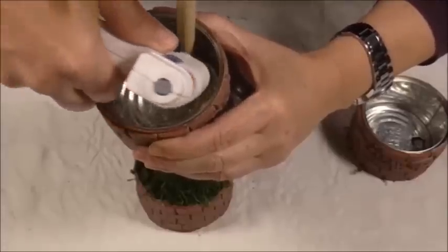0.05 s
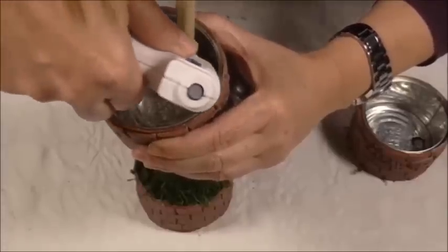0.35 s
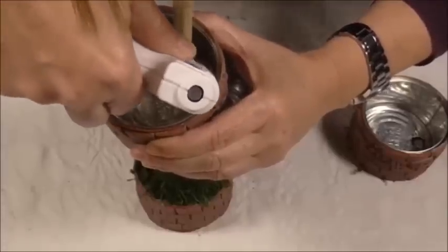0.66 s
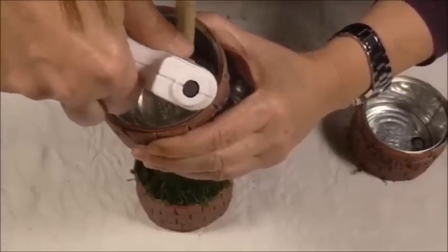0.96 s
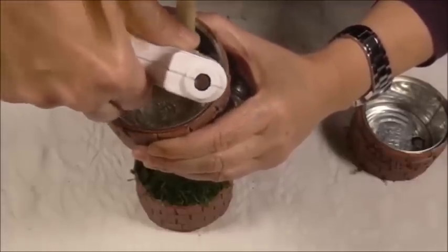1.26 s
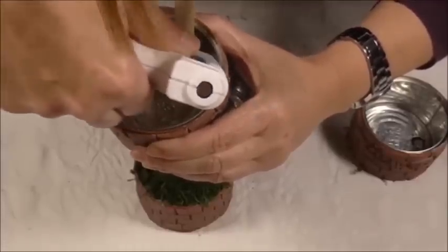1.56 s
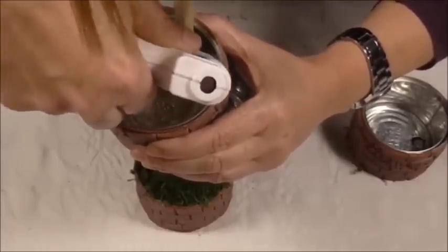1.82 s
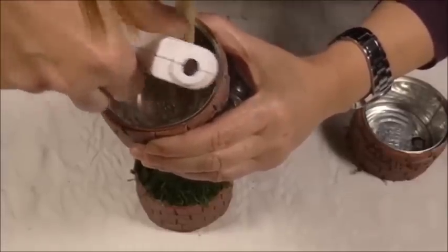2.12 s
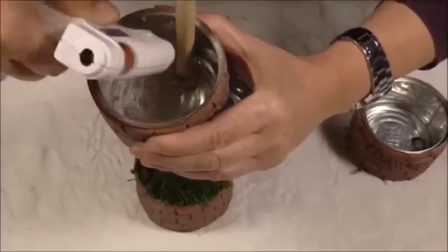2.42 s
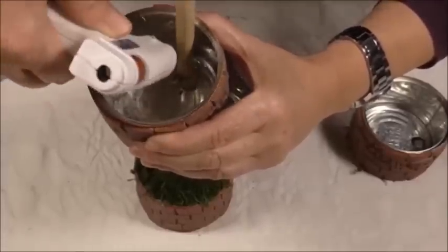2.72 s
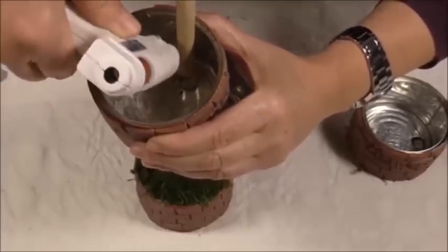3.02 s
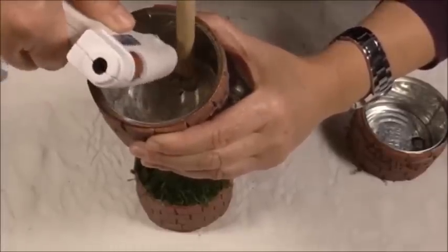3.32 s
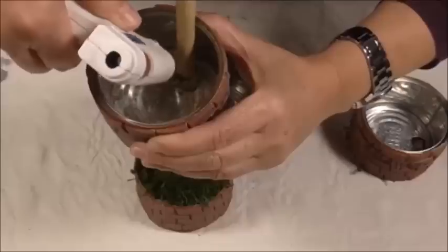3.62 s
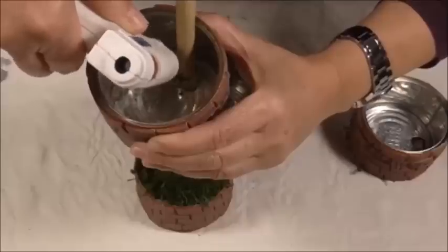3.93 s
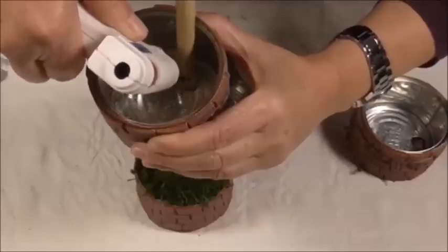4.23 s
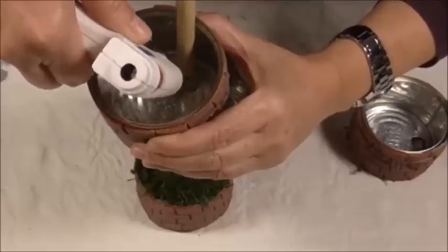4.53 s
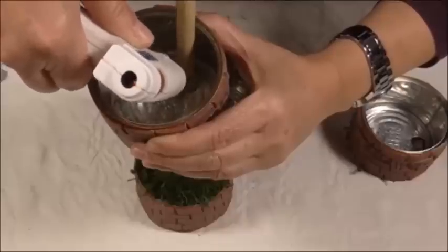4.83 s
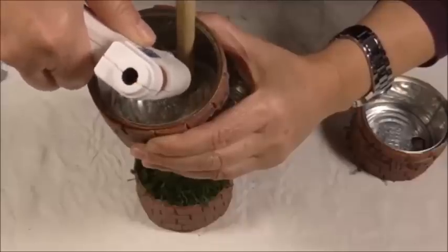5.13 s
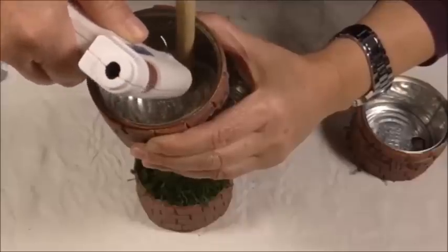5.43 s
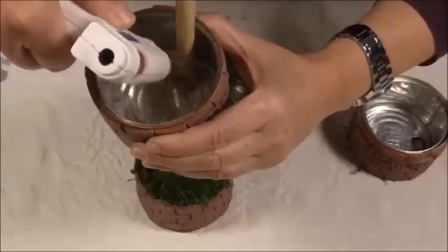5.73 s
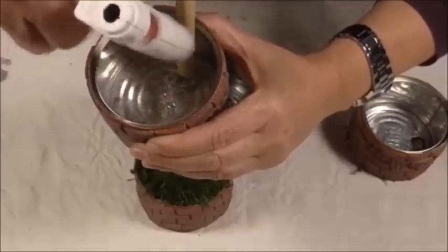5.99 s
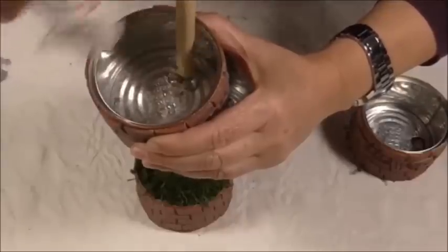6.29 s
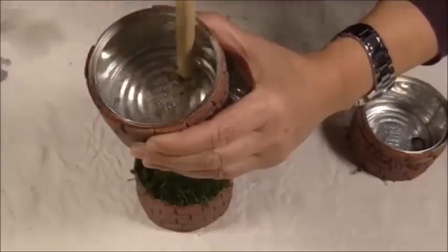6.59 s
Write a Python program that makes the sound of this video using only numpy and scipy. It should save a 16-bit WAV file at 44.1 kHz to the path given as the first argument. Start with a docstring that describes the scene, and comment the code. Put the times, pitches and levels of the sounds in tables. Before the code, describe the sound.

In a quiet small room, hands rub faintly on a tin can as a glue gun's nozzle knocks lightly against it. Close, thin trigger clicks and springy snaps come about once a second, mixed with soft table bumps and the faint drag of the glue stick. One sharp crack stands out, a few more clicks follow, then dull thuds and a sleeve brushing the tablecloth.

```python
"""In a small quiet room, a hot glue gun is squeezed inside a tin can on a paper-covered table. Hands rub and
crackle as they shift their grip, the table booms softly under them, and the nozzle knocks on the tin. The
plastic trigger ticks, then snaps home with a zing of its spring; the glue stick drags through its guide, and
once it jams and lets go with a loud crack and a brief trailing hiss. At the end the gun is laid down and a
sleeve swishes over the paper."""
import sys
import numpy as np
from scipy import signal
from scipy.fft import rfft, irfft, next_fast_len
from scipy.io import wavfile
from scipy.ndimage import uniform_filter1d

SR = 44100
rng = np.random.default_rng(int(sys.argv[2]) if len(sys.argv) > 2 else 0)


def inscribe(sig):
    """Save sig as 16-bit PCM at rate SR to the path in sys.argv[1].

    A 1-D sig is mono; a 2-D sig holds one channel per row.
    Samples are clipped to [-1, 1] before scaling.
    """
    pcm = np.round(np.clip(np.atleast_2d(sig).T, -1, 1) * 32767)
    wavfile.write(sys.argv[1], SR, pcm.astype(np.int16))


N = 302284


def gain_of(db):
    """Decibels to amplitude."""
    return 10 ** (np.asarray(db) / 20)


def unit_rms(x):
    """Scales to an rms of 1."""
    return x / np.sqrt(np.mean(x ** 2) + 1e-20)


def unit_peak(x):
    """Scales the loudest two milliseconds to an rms of 1."""
    return x / np.sqrt(uniform_filter1d(x ** 2, 88, mode="constant").max())


def curve_at(points, hz):
    """Reads a curve on a log-frequency axis."""
    f, value = np.transpose(points)
    return np.interp(np.log(hz + 1), np.log(f + 1), value)


def add(mix, s, sound):
    """Mixes a sound in at s seconds."""
    part = mix[..., max(round(s * SR), 0):][..., :sound.shape[-1]]
    part += sound[..., :part.shape[-1]]


def eq(x, points):
    """Minimum-phase EQ through the given (Hz, dB) points."""
    size = 2 * len(x)
    log_gain = np.log(gain_of(curve_at(points, abs(np.fft.fftfreq(size, 1 / SR)))))
    response = np.exp(np.conj(signal.hilbert(log_gain)))
    return np.fft.ifft(np.fft.fft(x, size) * response).real[:len(x)]


def stereo_noise(spectrum, correlation, resonances=()):
    """Noise of rms 1 with a given spectrum, left-right correlation and resonances."""
    hz = np.fft.rfftfreq(N, 1 / SR)
    a, b = rfft(rng.standard_normal((2, N)))
    same = np.clip(curve_at(correlation, hz), -1, 1)
    pair = np.array([a, same * a + np.sqrt(1 - same ** 2) * b])
    peaks_db = sum(lift / (1 + (2 * (hz - f) / width) ** 2) for f, width, lift in resonances)
    return unit_rms(irfft(pair * gain_of(curve_at(spectrum, hz) + peaks_db), N))


def noise_band(hz, width_hz, size):
    """Noise of rms 1 in one resonance."""
    edges = np.clip([hz - width_hz / 2, hz + width_hz / 2], 30, SR / 2 - 100)
    bandpass = signal.butter(2, edges, "band", fs=SR, output="sos")
    return unit_rms(signal.sosfilt(bandpass, rng.standard_normal(size)))


def ring(modes, t, pitch=1):
    """Dying sines, neighbours in opposite polarity."""
    return sum((-1) ** k * gain_of(db - 60 * t / t60) * np.sin(2 * np.pi * hz * pitch * t)
               for k, (hz, db, t60) in enumerate(modes))


def strike(modes, t, detune, chatter_db, chatter_t60, spike):
    """A contact gives a spike and a brief chatter and rings the object, a little differently each time."""
    force = rng.standard_normal(len(t)) * gain_of(-60 * t / chatter_t60)
    force[0] = spike
    chatter = eq(force, [(250, -4.5), (900, 3), (16000, -2.5)])
    body = ring(modes, t, pitch=1 + detune * rng.uniform(-1, 1))
    return unit_peak(unit_peak(body) + gain_of(chatter_db) * unit_peak(chatter))


def room_send(direct, colour):
    """Summed over all directions a hit keeps its energy and broad colour, but its notches even out."""
    pulse = eq(signal.unit_impulse(len(direct)), colour)
    return pulse * np.linalg.norm(direct) / np.linalg.norm(pulse)


# Colour of the still air. Each row: frequency in Hz, relative level in dB.
AIR_EQ = [(12, -45), (20, -16.5), (104, -8.5), (163, -0.5), (270, -8.5), (337, -0.5), (388, -7.5),
          (558, -3), (698, -9.5), (1060, -9), (2910, -22.5), (4180, -20), (7950, -26), (14300, -26),
          (16000, -34.5)]
# Its stereo image. Each row: frequency in Hz, left-right correlation.
AIR_IMAGE = [(60, 0.3), (180, 0.17), (550, -0.39), (1650, -0.42), (4970, 0.26), (15000, 0.097)]


def room_tone(level_db):
    """A wide, steady bed of low air."""
    return gain_of(level_db) * stereo_noise(AIR_EQ, AIR_IMAGE)


# The dull rub on the paper. Each row: frequency in Hz, relative level in dB.
RUB_EQ = [(30, -46), (80, -29), (130, -16), (400, -9), (900, -9), (1500, -8.5), (2200, -12), (2500, -19),
          (3500, -35.5), (6000, -58.5)]
# The table top colours what rubs or lands on it. Each row: centre in Hz, width in Hz, boost in dB.
TABLETOP_PEAKS = [(145.4, 25, 12.5), (303, 190, 9), (456, 42, 9), (645, 53, 6.5), (793, 55, 10.5),
                  (1064, 70, 10), (1380, 70, 6.5), (1655, 30, 3.5)]
# Stereo image of close rubs and thuds. Each row: frequency in Hz, left-right correlation.
CLOSE_IMAGE = [(60, 0.19), (180, 0.45), (550, 1), (1650, 0.38), (4970, 0.84), (15000, 0.16)]


def friction(grain_db):
    """Skin and fabric textures: a dull rub, and a fast flutter of gain that makes a hiss grainy."""
    grain = gain_of(grain_db * unit_rms(uniform_filter1d(rng.standard_normal(N), size=180)))
    return stereo_noise(RUB_EQ, CLOSE_IMAGE, TABLETOP_PEAKS), grain


# The hands shift their grip, and a brief hiss trails the loud crack (the row at 4.53 s).
# Each row: start in seconds, length in seconds, relative level in dB.
RUSTLE_SWELLS = [(-0.05, .58, -52.5), (0.727, 0.076, -56), (1.105, 0.36, -55), (1.72, 0.029, -55.5),
                 (2.14, .68, -53.5), (3.46, 0.48, -56.5), (4.53, .1, -64), (5.422, 0.23, -67)]


def rustle_envelope(rest_db=-67, attack_s=.04, release_s=.09, sag_db_per_s=-2.5):
    """Each grip shift, and the hiss after the crack, sets in, sags and dies back to the resting level."""
    t, power = np.arange(N) / SR, gain_of(rest_db) ** 2
    for start, length, db in RUSTLE_SWELLS:
        held = np.clip(t - start, 0, length)
        attack = np.minimum(held / attack_s, 1)
        release = np.exp(-np.maximum(t - start - length, 0) / release_s)
        power += (gain_of(db + sag_db_per_s * held) * attack * release) ** 2
    return np.sqrt(power)


# The sleeve's bright rustle. Each row: frequency in Hz, relative level in dB.
SLEEVE_EQ = [(1530, -34), (2600, -10), (3290, -9.5), (3720, -5), (3990, -13.5), (4390, -4.5), (4780, -8),
             (5060, -5.5), (7150, -9.5), (12000, -16), (15600, -44.5), (22000, -120)]


def rustle(rub, grain, rub_db, sleeve_db):
    """Skin rubs and the sleeve rustles; the same textures make the hiss after the crack."""
    sleeve = grain * stereo_noise(SLEEVE_EQ, CLOSE_IMAGE)
    return rustle_envelope() * (gain_of(rub_db) * rub + gain_of(sleeve_db) * sleeve)


# Pushes and landings on the table. Each row: start in seconds, relative boom level in dB,
# boom attack in seconds, boom tilt in dB per octave, thud level in dB.
TABLE_BUMPS = [(0.001, -54, .007, 4, -61), (0.205, -52, 0.013, 6, -64), (0.752, -50, 0.012, -0.5, -71),
               (1.083, -43, 0.008, -7, -47.5), (1.112, -42, .007, 4.5, -56), (1.315, -38.5, 0.1, 11.5, -55),
               (1.405, -43, 0.02, 9, -65), (1.53, -48.5, .009, 1, -64), (2.21, -45, 0.0041, 3, -49),
               (2.53, -42, 0.016, 10.5, -47.5), (2.562, -32.5, 0.013, 3.5, -63),
               (2.925, -59, .008, 10, -67), (3.57, -52, .024, -11, -57), (4.428, -46.5, 0.014, 4, -67),
               (6.15, -53, 0.016, 10, -41.5), (6.535, -46.5, .01, -5, -39.5), (6.79, -66, .01, -2, -63)]
# The table's low modes. Each row: frequency in Hz, relative level in dB, T60 in seconds.
TABLE_MODES = [(90.7, -11.5, 0.088), (147.4, -2, 0.36), (210.2, -8.5, 0.28), (300.4, -11.5, 0.2),
               (381, -11.5, 0.042), (515, -26.5, .15)]
# The muffled thud. Each row: frequency in Hz, relative level in dB.
THUD_EQ = [(30, -40), (80, -16), (130, -15), (320, 1), (500, -8), (780, 0), (1300, -4.5), (1800, -9.5),
           (2700, -35), (6000, -51)]


def table_bumps(thud_t60, boom_left_db):
    """Each push swells the table's low modes and gives a dull thud through the paper cover."""
    t, boom, thud_envelope = np.arange(SR // 2) / SR, np.zeros(N), np.zeros(N)
    pivot_hz = TABLE_MODES[1][0]
    for s, db, attack_s, tilt, thud_db in TABLE_BUMPS:
        modes = [(hz, level + tilt * np.log2(hz / pivot_hz), t60) for hz, level, t60 in TABLE_MODES]
        add(boom, s, 2 * gain_of(db) * (1 - np.exp(-t / attack_s)) * ring(modes, t))
        add(thud_envelope, s, gain_of(thud_db - 60 * t / thud_t60))
    pan = gain_of([[boom_left_db / 2], [-boom_left_db / 2]])
    return pan * boom + thud_envelope * stereo_noise(THUD_EQ, CLOSE_IMAGE, TABLETOP_PEAKS)


# The tin can, damped by the hand. Each row: frequency in Hz, relative level in dB, T60 in seconds.
CAN_MODES = [(684, -0.5, 0.11), (752, -10, 0.11), (834, -8, 0.073), (1030, 0, .05), (1184, 0, 0.068),
             (1411, -5.5, 0.066), (1783, -6, 0.061), (1880, -19, .05), (2280, 1, 0.018), (3490, -6, 0.092),
             (4146, 4, 0.038), (4570, 8, 0.0085), (6070, -1, 0.017), (7200, -20.5, 0.011),
             (10000, 13, 0.0047), (12830, -7, .005)]
# Colour of a fingertip's tiny slip. Each row: frequency in Hz, gain in dB.
CRACKLE_EQ = [(300, -17), (1400, -6), (2500, -3.5), (4500, 0), (6500, -5), (12000, -19.5)]


def finger_crackle(level_db, spots, slips_per_s, spread_db):
    """Skin sticks and slips at random, faintly ticking the tin at a few spots; swells with the rustle."""
    t, out = np.arange(SR // 10) / SR, np.zeros(N)
    for _ in range(spots):
        strength = gain_of(spread_db * np.minimum(rng.exponential(1, N), 2))
        slips = strength * (rng.random(N) < slips_per_s / SR / spots)
        tick = strike(CAN_MODES, t, detune=.06, chatter_db=5.5, chatter_t60=.015, spike=2.7)
        out += signal.oaconvolve(slips, eq(tick, CRACKLE_EQ))[:N]
    return gain_of(level_db) * out * rustle_envelope()


# The nozzle meets the can. Each row: start in seconds, relative level in dB, lows in dB,
# treble in dB, frequency that the spot favours in Hz.
NOZZLE_KNOCKS = [(0.2099, -43.5, -11, -10, 1250), (0.2275, -42.5, -18, -16, 1680),
                 (0.2757, -42, -42, -9, 4400), (0.619, -49, -17, 15, 9000), (0.728, -48, -3, -7, 1000),
                 (1.075, -36.5, -2, -0.5, 694), (1.1141, -37, -22, -4, 1150), (1.298, -57, -8, 1, 5470),
                 (1.3992, -45.5, 1, -4, 1100), (2.1925, -43, -18, -3, 4200),
                 (2.2069, -31.5, -20, -4.5, 1210), (2.2293, -37.5, -1, -6, 1230),
                 (2.5247, -26, 2, -22, 760), (2.5464, -37, 8, -6, 818), (3.5728, -39, -16, -7, 1380),
                 (3.843, -43.5, -22, -9, 3800), (4.4494, -58.5, -12.5, -14, 1080),
                 (4.7902, -40.5, -10, -3.5, 1200), (4.854, -44.5, -12.5, -11.5, 1110),
                 (4.9793, -46, -34, -14, 2120), (5.4111, -36.5, -12, -9, 5070),
                 (5.4893, -52, -4, -15, 1090), (5.9932, -42.5, 1, -18, 900),
                 (6.0106, -44.5, -15, -12, 1050)]


def nozzle_knocks(level_db, spot_db, top_db):
    """The nozzle knocks and scuffs on the tin wall; each spot favours its own part of the spectrum."""
    t, out = np.arange(SR // 5) / SR, np.zeros(N)
    for s, db, low_db, high_db, spot_hz in NOZZLE_KNOCKS:
        knock = strike(CAN_MODES, t, detune=0.021, chatter_db=4, chatter_t60=0.067, spike=4)
        knock = eq(knock, [(spot_hz / np.sqrt(2), 0), (spot_hz, spot_db), (spot_hz * np.sqrt(2), 0)])
        colour = [(800, low_db), (1100, -5.0), (2800, -6.5), (4800, high_db), (8000, high_db),
                  (10500, high_db + top_db)]
        add(out, s, gain_of(db + level_db) * unit_peak(eq(knock, colour)))
    return out


# The trigger ticks as it takes up slack. Each row: start in seconds, relative level in dB,
# treble in dB, ring frequency in Hz.
TRIGGER_TICKS = [(0.765, -41.5, 1, 8340), (0.779, -38, -1.5, 4740), (1.1043, -33.5, -8, 8000),
                 (1.9653, -30, 2, 6950), (2.1978, -34, -9, 4500), (2.5247, -33, -3.5, 5800),
                 (3.1837, -54, -4, 6000), (3.2395, -50.5, 2, 4840), (3.254, -45, 5, 7700),
                 (3.5585, -32.5, -7, 7900), (4.1985, -35.5, -1.5, 5600), (4.4856, -31.5, -11.5, 7660),
                 (5.0246, -31.5, 1.5, 7550), (5.3649, -25.5, -2.5, 7520)]
# Let go, it snaps home on its spring. Each row: start in seconds, relative level in dB, ring in Hz.
TRIGGER_SNAPS = [(0.849, -27, 6560), (2.0042, -26, 6450), (3.3129, -26, 5950), (4.2596, -26, 7000),
                 (5.0518, -26, 7330)]
# The plastic shell and lever. Each row: frequency in Hz, relative level in dB, T60 in seconds.
SHELL_MODES = [(1083, -1.5, 0.081), (1357, 8.5, 0.0073), (2660, 2, 0.0089), (3527, -23, 0.017),
               (4010, -6.5, 0.019), (4640, -4, 0.0099), (5240, 14.5, 0.003), (6200, 0, 0.031),
               (6850, -6.5, 0.0031), (7970, 1.5, 0.051), (9420, 12, 0.011), (9830, 2.5, 0.0086),
               (11690, 13.5, 0.012), (12900, -6, .008), (13770, 10.5, 0.013), (14700, 2, .009)]


def trigger_clicks(level_db, focus_db, tick_lows_db=-12.5, snap_lows_db=-25.5, snap_treble_db=-5.5):
    """Hollow ticks and thin snaps ring the plastic shell. Returns the direct sound and its room send."""
    t, out = np.arange(SR // 10) / SR, np.zeros((2, N))
    ticks = [(s, db, tick_lows_db, high_db, hz) for s, db, high_db, hz in TRIGGER_TICKS]
    snaps = [(s, db, snap_lows_db, snap_treble_db, hz) for s, db, hz in TRIGGER_SNAPS]
    for s, db, low_db, high_db, focus_hz in ticks + snaps:
        click = strike(SHELL_MODES, t, detune=0.069, chatter_db=-5, chatter_t60=0.025, spike=2.6)
        click = eq(click, [(focus_hz / 1.08, 0), (focus_hz, focus_db), (focus_hz * 1.08, 0)])
        colour = [(300, low_db + 0.5), (1100, low_db + 3.0), (2100, low_db + 3.5), (4200, 0), (7400, 0),
                  (8600, high_db - 4), (10500, high_db)]
        click = gain_of(db + level_db) * unit_peak(eq(click, colour))
        add(out, s, np.array([click, room_send(click, colour)]))
    return out


def spring_zing(t60, width_hz, tick_db, snap_db):
    """The coil's crowded modes give a narrow zing on every tick and snap."""
    t, out = np.arange(SR // 3) / SR, np.zeros(N)
    for clicks, trim_db in (TRIGGER_TICKS, tick_db), (TRIGGER_SNAPS, snap_db):
        for s, db, *_, hz in clicks:
            add(out, s, noise_band(hz, width_hz, len(t)) * gain_of(db + trim_db - 60 * t / t60))
    return out


# The glue stick rubs in its guide, and the tin can rings faintly once (the row at 1.26 s).
# Each row: peak time in seconds, spread in seconds, centre in Hz, width in Hz, level in dB.
DRAGS_AND_RING = [(1.30, 0.0091, 4900, 2200, -56.5), (1.345, 0.02, 5200, 2000, -63),
                  (1.42, 0.012, 4430, 1410, -57.5), (1.26, 0.015, 1070, 100, -66),
                  (1.34, 0.0091, 1450, 600, -61.5), (3.76, 0.31, 370, 213, -60.5),
                  (3.83, 0.082, 5000, 653, -68), (4.453, 0.0097, 1180, 890, -56),
                  (4.75, 0.052, 4000, 930, -65.5)]


def stick_drags_and_can_ring(grain_db):
    """The stick drags in small slips as it is pushed forward, and the can rings faintly once."""
    t = np.arange(N) / SR
    grain = gain_of(grain_db * unit_rms(uniform_filter1d(rng.standard_normal(N), size=200)))
    return grain * sum(noise_band(hz, width, N) * gain_of(db) * np.exp(-((t - s) / spread) ** 2 / 2)
                       for s, spread, hz, width, db in DRAGS_AND_RING)


# Colour of the jammed stick letting go. Each row: frequency in Hz, gain in dB.
CRACK_EQ = [(88, -39), (150, -15.5), (800, -19), (1140, -9.5), (2140, -19), (2450, -6), (2760, -18),
            (3420, -4.5), (4320, -10), (5000, 2.5), (5680, -3.5), (6260, -1), (8560, -11.5), (13400, -8),
            (16000, -28)]
# Its ring-out. Each row: centre in Hz, width in Hz, level in dB, T60 in seconds.
CRACK_TAILS = [(1245, 316, -45.5, 0.43), (2700, 170, -52.5, 0.67), (3330, 150, -42, 0.098),
               (4990, 760, -42.5, 0.59), (5750, 280, -49, .3), (7980, 300, -52.5, 0.246),
               (9900, 570, -58, 0.28)]


def stick_crack(s, db, rise_s, fall_s, rattle_db, rattle_t60):
    """The jammed glue stick slips ever faster, lets go with a jolt and rattles. Returns direct sound and send."""
    t, direct, send = np.arange(SR // 2) / SR, np.zeros(N), np.zeros(N)
    since_stop = t - .004
    slam = np.exp(np.minimum(since_stop / rise_s, -since_stop / fall_s))
    rattle = (since_stop > 0) * gain_of(rattle_db - 60 * abs(since_stop) / rattle_t60)
    force = (slam + rattle) * np.sign(rng.standard_normal(len(t)))
    hit = gain_of(db) * unit_peak(eq(force, CRACK_EQ))
    add(direct, s + since_stop[0], hit)
    add(send, s, room_send(hit, CRACK_EQ))
    for hz, width_hz, ring_db, t60 in CRACK_TAILS:
        add(direct, s, noise_band(hz, width_hz, len(t)) * gain_of(ring_db - 60 * t / t60))
    return np.array([direct, send])


# The sleeve brushes the paper as the arm moves away. Each row: peak time in seconds, half length in seconds,
# relative rub level in dB, relative hiss level in dB.
ARM_SWISHES = [(5.93, 0.057, -62.5, -67), (6.17, 0.033, -47.5, -52), (6.418, 0.027, -48.5, -48.5),
               (6.518, 0.08, -51.5, -65), (6.72, 0.084, -46, -50.5), (6.832, .03, -38.5, -46)]
# Sleeve hissing over paper. Each row: frequency in Hz, relative level in dB.
HISS_EQ = [(1530, -33), (2600, -10.5), (3170, -8), (5110, 1), (6430, -1.5), (7310, -2), (8710, -5),
           (10500, -8), (13800, -14.5), (14700, -19), (16000, -32.5)]


def arm_swishes(rub, grain, rub_db, hiss_db):
    """Rub and grainy hiss follow the arm's speed, which swells and falls as a bell."""
    t, rub_power, hiss_power = np.arange(N) / SR, np.zeros(N), np.zeros(N)
    for s, half_length, low_db, high_db in ARM_SWISHES:
        speed = 1 / np.cosh(np.clip((t - s) / half_length, -20, 20))
        rub_power += (gain_of(rub_db + low_db) * speed) ** 2
        hiss_power += (gain_of(hiss_db + high_db) * speed) ** 2
    return np.sqrt(rub_power) * rub + np.sqrt(hiss_power) * grain * stereo_noise(HISS_EQ, CLOSE_IMAGE)


# The small room's decay. Each row: frequency in Hz, T60 in seconds.
REVERB_DECAY = [(300, .28), (1300, 0.2), (4500, 0.38), (7000, 0.41), (13000, .22)]
# Colour of its reflections. Each row: frequency in Hz, relative level in dB.
REVERB_EQ = [(200, -19), (1200, -0.5), (3000, -4.5), (5200, -8.5), (7500, -7.5), (9500, -5.5), (14000, -15)]


def reverb(send, correlation, build_s):
    """A dense tail of reflections, partly shared by both channels, each band dying at its own speed."""
    a, b = rng.standard_normal((2, SR // 2)) * (rng.random((2, SR // 2)) < .2)
    taps = np.array([a, correlation * a + np.sqrt(1 - correlation ** 2) * b])
    hz, t, bands = signal.stft(taps / np.linalg.norm(a), SR, nperseg=256)
    t60 = curve_at(REVERB_DECAY, hz)[:, None]
    bands *= gain_of(curve_at(REVERB_EQ, hz)[:, None] - 60 * t / t60) * np.sqrt(np.log(1000) / t60)
    tail = signal.istft(bands, SR, nperseg=256)[1]
    tail *= np.minimum(np.arange(tail.shape[1]) / SR / build_s, 1)
    return signal.fftconvolve(send[None], tail, axes=1)[:, :N]


# Phase between the microphone ports. Each row: frequency in Hz, left's lead in radians.
MIC_PHASE = [(200, 0.59), (6000, 0.28), (9500, -1.2), (10500, 0.69), (13000, 0.81), (16000, 0.21)]
# Their balance. Each row: frequency in Hz, left minus right in dB.
MIC_BALANCE = [(200, 3), (700, -2.2), (8000, -1), (9500, -3.5), (12000, -5.5), (14500, 1)]


def mic_ports(x):
    """Sound reaches the two microphone ports with small differences of phase and level."""
    size = next_fast_len(N + SR // 10)
    hz = np.fft.rfftfreq(size, 1 / SR)
    left = np.exp(.5j * curve_at(MIC_PHASE, hz)) * gain_of(curve_at(MIC_BALANCE, hz) / 2)
    return irfft(rfft(x, size) * np.array([left, 1 / left]), size)[:, :N]


def scene():
    """Gun, can and table in the room, over rustling cloth and still air."""
    clicks = trigger_clicks(level_db=-3.5, focus_db=9.5)
    crack = stick_crack(s=4.5198, db=-13.0, rise_s=0.0014, fall_s=0.0009, rattle_db=-29, rattle_t60=0.034)
    gun, gun_send = clicks + crack
    contacts = (nozzle_knocks(level_db=-7.5, spot_db=9, top_db=-13.5)
                + stick_drags_and_can_ring(grain_db=-0.5)
                + spring_zing(t60=0.18, width_hz=1300, tick_db=-23.5, snap_db=-18.5)
                + finger_crackle(level_db=-11.5, spots=6, slips_per_s=37, spread_db=7))
    room = reverb(gun_send + contacts, correlation=0.54, build_s=0.0059)
    rub, grain = friction(grain_db=1.5)
    rustling = rustle(rub, grain, rub_db=-7.0, sleeve_db=-13.5)
    arm = arm_swishes(rub, grain, rub_db=-2, hiss_db=1.0)
    table = table_bumps(thud_t60=0.35, boom_left_db=1.5)
    return mic_ports(gun + contacts + room + rustling + arm) + table + room_tone(level_db=-59.5)


def record(dry):
    """A steep high cut at 16.4 kHz on the whole mix."""
    high_cut = signal.firwin(255, 16400, window=("kaiser", 9), fs=SR)
    return signal.oaconvolve(dry, high_cut[None], "same")


dry = scene()
out = record(dry)
inscribe(out)
```